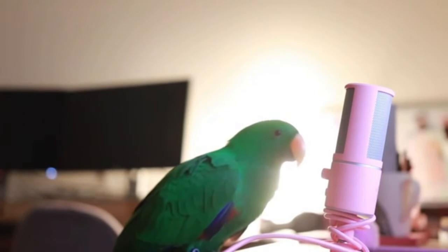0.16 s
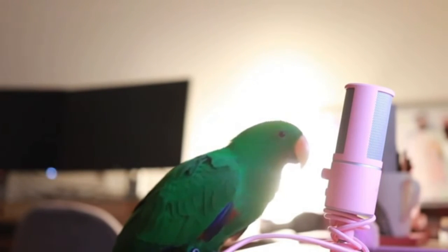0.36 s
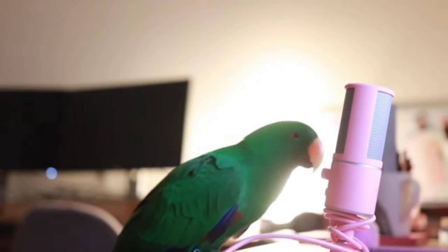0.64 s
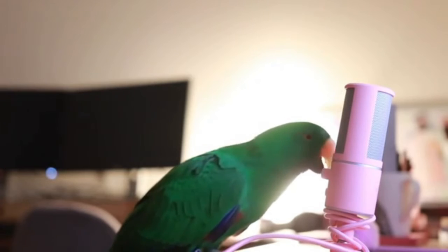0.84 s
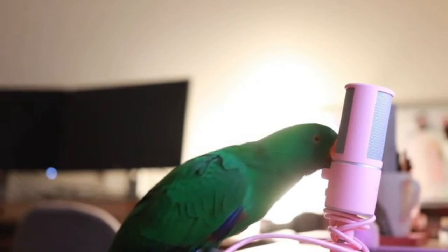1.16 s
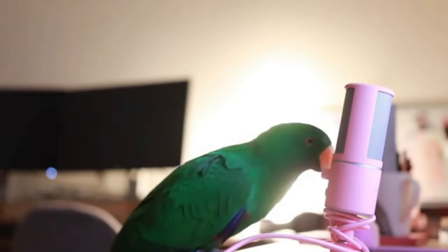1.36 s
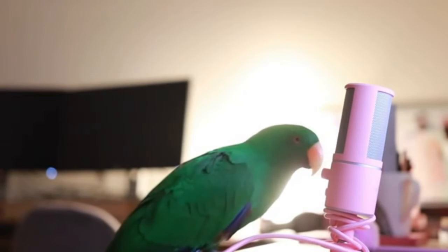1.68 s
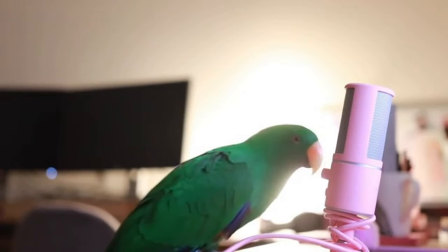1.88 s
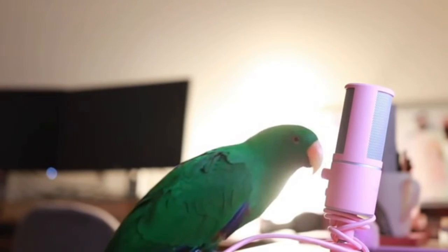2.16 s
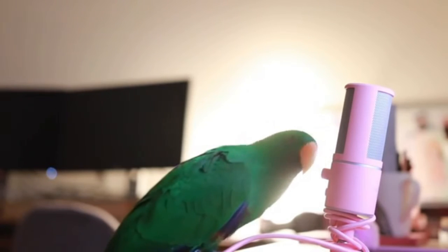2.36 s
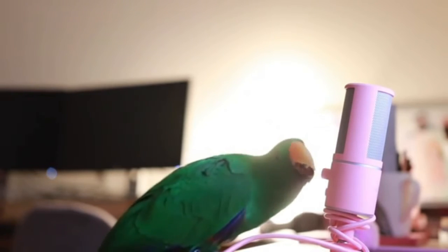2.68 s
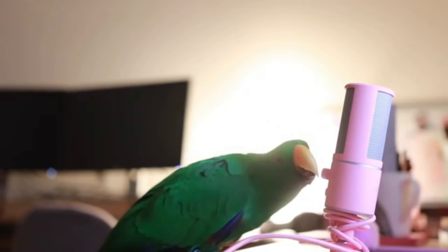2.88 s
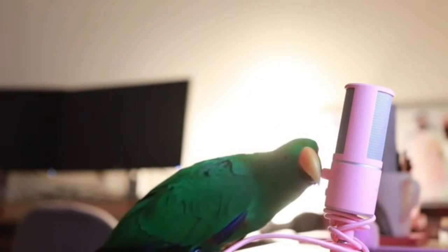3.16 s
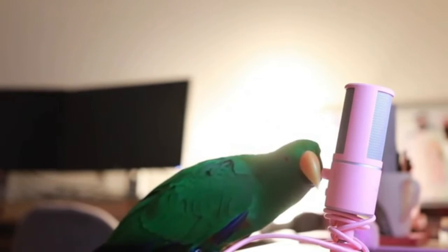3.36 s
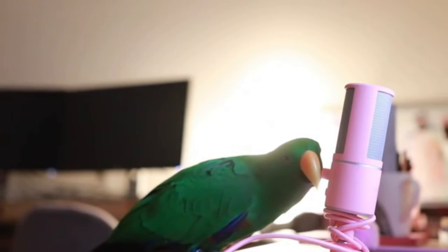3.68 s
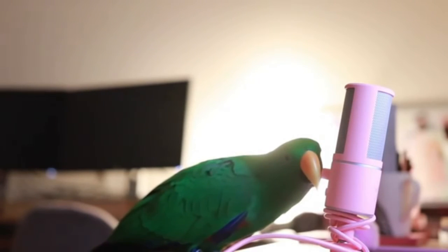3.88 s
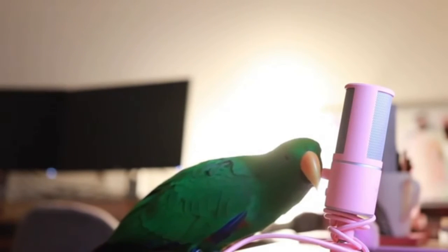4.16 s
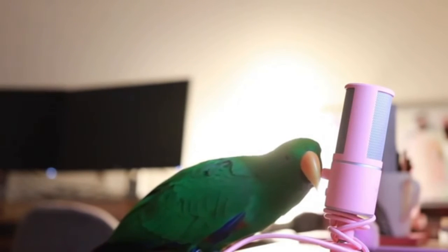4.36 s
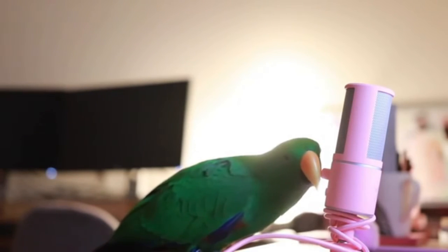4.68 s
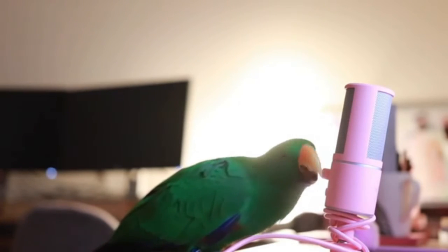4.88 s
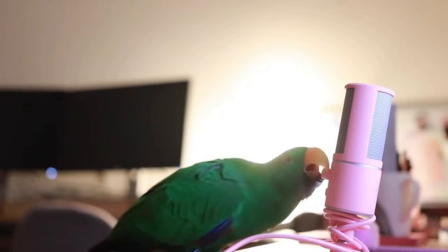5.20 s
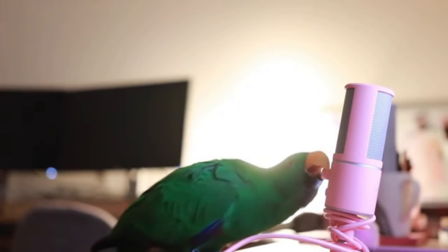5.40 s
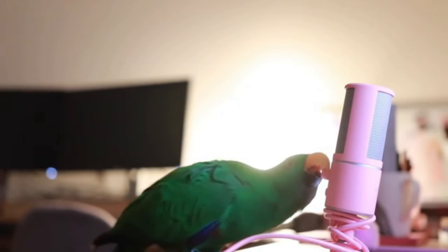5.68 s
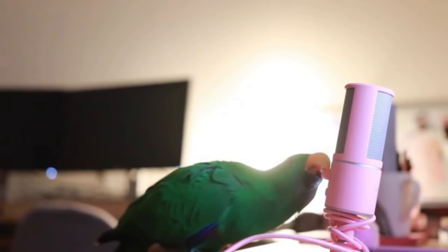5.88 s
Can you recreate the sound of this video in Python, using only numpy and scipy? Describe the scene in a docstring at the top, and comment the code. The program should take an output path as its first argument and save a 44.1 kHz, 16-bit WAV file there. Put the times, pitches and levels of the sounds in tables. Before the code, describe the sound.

Close to the microphone in a small quiet room, a parrot chirps once, sharply, with a brief echo. Soft rustling and two quick ticks lead to dull bumps and short scrapes on the ringing housing. A steady run of eight wet, popping clucks swells until the microphone overloads. It ends with beak rubs, a sharp clacking knock, rattly ticks and faint nibbling over a deep, wobbling stand rumble.

```python
"""A quiet room murmurs under a faint rumble; feathers rustle as filtered noise, and a beak tick rings briefly.
A parrot close to a desk microphone then gives one sharp chip: a high note that slackens into rough pulses.
Later its beak knocks and rubs on the microphone's housing, which rings and wobbles on its stand.
Eight clucks, short rings of mouth, beak, throat and chest, grow louder; more ticks, rubs and knocks follow.
The loudest calls overload the microphone, and a small room echoes the calls and ticks."""
import sys
import numpy as np
from scipy import signal
from scipy.fft import rfft, irfft
from scipy.io import wavfile
from scipy.ndimage import uniform_filter1d

SR = 44100
rng = np.random.default_rng(int(sys.argv[2]) if len(sys.argv) > 2 else 0)


def generate_wav(signal):
    """Clip the signal to [-1, 1] and save it as 16-bit WAV at the path in sys.argv[1]."""
    frames = np.transpose(np.atleast_2d(signal))
    scaled = np.clip(frames, -1, 1) * 32767
    pcm = np.round(scaled).astype(np.int16)
    wavfile.write(sys.argv[1], SR, pcm)


N = 266364
TIME = np.arange(N) / SR
TOP_HZ = 15700  # highest pitch kept

# sound colour of the quiet room: pitch_hz, level_db (per Hz)
ROOM_COLOUR = [(20, 0.5), (50, -10.5), (95, -5), (170, -17), (280, -16), (520, -28.5), (1700, -33.5),
               (2250, -32), (2600, -38.5), (4200, -42), (4900, -53), (6500, -49), (8000, -53.5),
               (15000, -57)]
# how the rumble changes as the bird leans on the microphone: time_s, level_db
LEANING_LEVELS = [(3.15, -61.5), (3.24, -43), (3.65, -40.5), (4.6, -43.5), (5.03, -34.5), (5.3, -37),
                  (5.95, -33), (6.04, -30)]
# sound colour of that rumble: pitch_hz, level_db (per Hz)
RUMBLE_COLOUR = [(15, -14), (28, 1.5), (45, -17.5), (75, -12), (125, -11.5), (170, -22.5), (260, -29.5),
                 (500, -45), (1000, -69)]
# faint rustles of feathers: start_s, length_s, level_db
FEATHER_RUSTLES = [(0.678, 0.7, -74.5), (2.43, 0.72, -69.5), (3.33, 0.39, -74.5), (5.4, 0.48, -76.5)]
# beak ticks: start_s, peak_db, beak_ring_hz, housing_db (compared with the peak)
BEAK_TICKS = [(1.33, -54, 4480, -5), (2.885, -35.5, 2600, -14), (2.908, -37.5, 2320, -12),
              (3.527, -42, 1600, 9.5), (4.888, -30.5, 1630, -27), (5.106, -38, 9400, -21),
              (5.512, -37, 2560, -21), (5.708, -48.5, 6800, 12), (5.742, -31, 2600, -8),
              (5.817, -37.5, 4500, -7.5), (5.907, -40.5, 2770, -24)]
# ways the microphone housing rings: pitch_hz, width_hz, level_db
HOUSING_RINGS = [(444, 244, -1), (666, 143, -0.5), (919, 75, -1), (1236, 57, -1), (1600, 230, -3),
                 (2200, 130, 7), (2520, 120, -2), (3050, 300, -5.5), (4185, 110, 4.5), (4480, 160, -8.5),
                 (5600, 500, -20), (6200, 360, -19), (7360, 350, -49.5), (8640, 490, -35.5),
                 (11890, 4500, -47)]
# echo of the small room: pitch_hz, level_db, t60_s (time to fade by 60 dB)
ROOM_ECHO = [(204.6, -43.5, .4), (697, -26.5, 0.34), (1583, -25.5, 0.37), (2300, -28.5, 0.36),
             (3180, -26, 0.41), (5000, -27.5, 0.4), (6500, -27.5, .33), (7853, -28, 0.11),
             (13910, -28, .15)]
# colour of throat and open beak: pitch_hz, level_db
THROAT_COLOUR = [(100, -15), (400, -12.5), (800, -10), (1600, -3.5), (2200, -1.5), (3150, -1), (4000, -3.5),
                 (4800, -20), (5500, -14), (6400, -27.5), (7900, -18), (9000, -31.5), (11000, -20),
                 (16000, -42.5)]
# knocks that shake the stand: start_s, thump_db, wobble_db and thud_db (compared with thump), clack_db
STAND_KNOCKS = [(3.186, -16.5, -8, -13, -40.5), (3.244, -26.5, -28, -10, -35.5),
                (5.146, -14, -20, -47, -17.5), (5.355, -13.5, -14, -19, -31),
                (5.636, -23, -1.5, -29.5, -45), (5.739, -18.5, -36, -13, -39), (5.932, -23, -14, -13, -60)]
# colour of the dull thud in a knock: pitch_hz, level_db (per Hz)
THUD_COLOUR = [(30, -16), (70, 9.5), (200, -2), (700, -13.5), (1600, -50)]
# beak strokes along the housing: start_s, length_s, pressure_db (at the end)
BEAK_STROKES = [(3.245, 0.042, -44.5), (3.353, 0.12, -48.5), (3.501, 0.0446, -47), (4.34, 0.028, -57.5),
                (4.759, .013, -59), (4.897, 0.2, -40.5), (5.179, 0.043, -53.5), (5.261, .102, -38),
                (5.928, 0.063, -55.5)]
# broad grit of the scraping beak itself: pitch_hz, width_hz, level_db
BEAK_GRIT = [(1130, 1300, -10.5), (8000, 8000, -31.5)]
# clucks: start_s, level_db, mouth_hz, mouth_swell_ms, beak_hz, beak_db (compared with mouth)
CLUCK_CALLS = [(3.609, -14.3, 1955, 0.79, 1330, -1.7), (3.787, -12.5, 1780, 0.63, 1426, -0.5),
               (3.953, -10.5, 1564, 0.87, 1380, -11.5), (4.112, -6.5, 1395, 0.85, 1530, -7.5),
               (4.278, -4.5, 1360, 1.07, 1560, -1), (4.4464, -4, 1580, 1.3, 1910, -13.5),
               (4.6177, -1.5, 1700, 1.6, 1970, -8.5), (4.785, 1.5, 1610, 2.11, 1938, 1.5)]
# wet snap of the tongue: pitch_hz, width_hz, level_db
TONGUE_SNAP = [(2470, 380, 8.5), (5180, 520, -4.5), (6450, 1170, -0.5), (9580, 850, -15.5),
               (12400, 910, -10.5)]
# narrow dips in the colour of a cluck: pitch_hz, width_hz
MOUTH_DIPS = [(560, 91), (3550, 400)]


def undb(db):
    """Turn decibels into a plain multiplier."""
    return 10 ** (np.asarray(db) / 20)


def unit(x):
    """Scale to an average (rms) level of 1."""
    return x / np.sqrt(np.mean(x ** 2))


def peak(x):
    """Scale so the highest point is 1."""
    return x / np.abs(x).max()


def add(track, start_s, sound):
    """Mix a sound into the track at a given time."""
    i = int(np.clip(start_s * SR, 0, N - 1))
    track[i:i + len(sound)] += sound[:N - i]


def colour(x, points):
    """Filter a sound to follow a curve of levels over pitch."""
    hz, db = np.transpose(points)
    pitches = np.maximum(np.fft.rfftfreq(len(x), 1 / SR), 1)
    gain = undb(np.interp(np.log(pitches), np.log(hz), db))
    return irfft(rfft(x) * gain, len(x))


def noise(points):
    """Make coloured noise with an average level of 1."""
    return unit(colour(rng.standard_normal(N), points))


def wander(size):
    """Slow random drift of spread 1, smoothed over size samples."""
    return unit(uniform_filter1d(rng.standard_normal(N), size=size))


def swell(t, length_s, attack_s, release_s):
    """A volume shape that rises, holds at 1 and falls to 0 at length_s."""
    return np.clip(np.minimum(t / attack_s, (length_s - t) / release_s), 0, 1)


def resonate(x, modes):
    """Ring several resonances side by side, each filtered twice for steep flanks."""
    out = 0
    for hz, width, db in modes:
        b, a = signal.iirpeak(min(hz, SR / 2 - 2000), max(hz / width, 1), SR)
        once = signal.lfilter(b, a, x)
        out = out + undb(db) * signal.lfilter(b, a, once)
    return out


def burst(t, hz, swell_ms, rise_octaves=0):
    """A ring that swells to 1 and soon dies, sliding through hz at its strongest moment."""
    u = t * 1000 / swell_ms
    pitch = hz * 2 ** (rise_octaves * np.tanh(u - 1))
    phase = 2 * np.pi * np.cumsum(pitch) / SR
    return u ** 2 * np.exp(2 - 2 * u) * np.sin(phase)


def crack(decay_ms):
    """The brief noise of a hard contact, dying away."""
    t = np.arange(SR // 20) / SR
    return rng.standard_normal(len(t)) * np.exp(-1000 * t / decay_ms)


def room_tone(level_db=-46.5):
    """The quiet room is steady coloured noise."""
    return undb(level_db) * noise(ROOM_COLOUR)


def leaning():
    """Low noise rumbles in the stand, with a level that follows how the bird leans on it."""
    times, levels_db = np.transpose(LEANING_LEVELS)
    return undb(np.interp(TIME, times, levels_db)) * noise(RUMBLE_COLOUR)


def feathers(attack_s=0.059, release_s=0.13):
    """A thin hiss that swells and fades each time the bird shifts."""
    motion = np.zeros(N)
    for start, length, db in FEATHER_RUSTLES:
        motion += undb(db) * swell(TIME - start, length, attack_s, release_s)
    return motion * noise([(1000, -20.5), (3000, -1.5), (6000, -5), (14000, -7), (16000, -16.0)])


def ticks(decay_ms=0.7, ring_width=0.45, crack_db=-22):
    """Beak horn meets horn or housing: a tiny crack, a short beak ring and the housing's own rings."""
    out = np.zeros(N)
    for start, db, hz, housing_db in BEAK_TICKS:
        contact = crack(decay_ms)
        # ring_width is a share of the ring's pitch
        beak = peak(resonate(contact, [(hz, ring_width * hz, 0), (6500, 6000, crack_db)]))
        housing = peak(resonate(contact, HOUSING_RINGS))
        add(out, start, undb(db) * (beak + undb(housing_db) * housing))
    return out


def echo(x, build_s=0.0014):
    """The small room answers with a blurred tail, whose highest treble dies soonest."""
    t = np.arange(SR * 2 // 3) / SR
    hz, db, t60 = np.transpose(ROOM_ECHO)
    pitches = np.maximum(np.fft.rfftfreq(len(t), 1 / SR), 1)
    scatter = rfft(rng.standard_normal(len(t)))
    tail = 0
    # each row of the identity picks one band, blending into its neighbours
    for share, band_db, band_t60 in zip(np.eye(len(hz)), db, t60):
        fade = np.exp(-np.log(1000) * t / band_t60) * (1 - np.exp(-t / build_s))
        band = irfft(scatter * np.interp(np.log(pitches), np.log(hz), share), len(t))
        tail = tail + undb(band_db) * band * fade / np.linalg.norm(fade)
    return signal.fftconvolve(x, tail)[:N]


def chip(rasp_db=-1, source_slope=0.1, darken=0.78, push_db=-21, rumble_db=-29):
    """The syrinx (voice organ) holds a high note, then slackens into rough, duller pulses that ring the throat."""
    start_s, hold_s, length_s = 1.458, 0.0148, 0.0328
    held_hz, sag_octaves_per_s = 1586, 112
    held_db, slack_db = 6, -4.5  # level of the held note; change when fully slack
    rough_held, rough_slack = 0.087, 0.5  # roughness from 0 to 1
    t = np.arange(int(length_s * SR)) / SR
    hz = held_hz * 2 ** (-sag_octaves_per_s * np.maximum(t - hold_s, 0))
    slack = 1 - hz / held_hz
    rough = rough_held + (rough_slack - rough_held) * slack
    envelope = swell(t, length_s, attack_s=0.0012, release_s=0.002)
    loudness = undb(held_db + slack_db * slack) * envelope
    jitter = wander(size=30)[:len(t)]
    phase = 2 * np.pi * np.cumsum(hz * (1 + 0.13 * rough * jitter)) / SR
    pulses = np.zeros(len(t))
    for k in range(1, 40):  # overtones, weaker higher up and when slack
        audible = k * hz < TOP_HZ
        pulses += np.sin(k * phase) * audible / k ** (source_slope + darken * slack)
    rasp = undb(rasp_db) * rough * (1 + np.cos(phase)) * rng.standard_normal(len(t))
    voice = colour(unit(pulses) + rasp, THROAT_COLOUR)
    # even out the level, so that loudness alone shapes it
    voice = voice / np.sqrt(uniform_filter1d(voice ** 2, size=160) + 1e-9)
    # a low, uneven push under the call, as the overloaded microphone is thrown off centre
    rumble = noise([(10, -4.5), (80, -3.5), (230, -4.5), (500, -16.0), (3000, -59.0)])[:len(t)]
    push = undb(push_db) + undb(rumble_db) * rumble
    out = np.zeros(N)
    add(out, start_s, (voice + push) * loudness)
    return out


def knocks(edge_db=-25, clack_low_hz=1200, clack_decay_ms=3.3):
    """Beak knocks clack on the housing, thump the stand and set it wobbling."""
    wobble_hz, wobble_t60_s = 27.3, 1
    thud_decay_s = 0.012  # dull shudder of the stand
    out, t = np.zeros(N), np.arange(SR) / SR
    wobble = np.sin(2 * np.pi * wobble_hz * t) * np.exp(-np.log(1000) * t / wobble_t60_s)
    thump = burst(t, hz=110.7, swell_ms=7.4)
    high_pass = signal.butter(1, clack_low_hz, "high", fs=SR)
    for start, db, wobble_db, thud_db, clack_db in STAND_KNOCKS:
        thud = unit(colour(rng.standard_normal(len(t)), THUD_COLOUR)) * np.exp(-t / thud_decay_s)
        shake = thump + undb(thud_db) * thud + undb(wobble_db) * wobble
        add(out, start, undb(db) * shake)
        contact = signal.lfilter(*high_pass, crack(clack_decay_ms))
        clack = peak(resonate(contact, HOUSING_RINGS + [(6840, 4200, edge_db)]))
        add(out, start, undb(clack_db) * clack)
    return out


def rubs(slips_per_s=2600, patchy_db=2.0, shift_db=0.5, rub_db=0.53):
    """The beak sticks and slips on the housing: dense uneven clicks make it ring."""
    stroke_swell_db, stroke_ease = 15, 4.4  # each stroke presses harder by this much, quickly at first
    nibble_start_s, nibble_db, nibble_spread_db = 5.41, -67, 6  # light, uneven nibbling from then on
    # lighter strokes are duller: dB per octave for each dB below a firm stroke
    firm_db, brighten = -32, 0.091
    pressure = (TIME > nibble_start_s) * undb(nibble_db + nibble_spread_db * wander(size=900))
    for start, length, db in BEAK_STROKES:
        to_go = np.linspace(1, 0, max(int(length * SR), 2))
        add(pressure, start, undb(db - stroke_swell_db * to_go ** stroke_ease))
    pressure = np.maximum(uniform_filter1d(pressure, size=160), 1e-9)
    slips = (rng.random(N) < slips_per_s / SR) * rng.standard_normal(N)
    slips = slips * undb(patchy_db * wander(size=400))
    force = slips * pressure / resonate(slips, HOUSING_RINGS).std()
    out = 0
    for hz, width, db in HOUSING_RINGS + BEAK_GRIT:
        tilt = (pressure / undb(firm_db)) ** (brighten * np.log2(hz / 3000))
        # as the point of contact moves, each ring is driven more or less
        drive = force * tilt * undb(shift_db * wander(size=1800))
        out = out + resonate(drive, [(hz, width, db)])
    return undb(rub_db) * out


def mouth_cavities(x):
    """Side cavities of the mouth swallow narrow bands of pitch."""
    for hz, width in MOUTH_DIPS:
        x = signal.lfilter(*signal.iirnotch(hz, hz / width, SR), x)
    return x


def clucks(chest_hz=320, chest_ms=0.84, throat_ms=1.23, beak_ms=0.93):
    """A few cycles ring in mouth, beak, throat and chest; the harder the cluck, the more the tongue snaps."""
    throat_hz, throat_db = 863, -5.5  # level compared with the mouth
    mouth_rise_octaves = 0.19  # the mouth's ring slides up as it opens
    # level in a 0 dB cluck, then dB gained for each dB of the cluck
    chest_db, chest_growth = -15.5, 0.4
    snap_db, snap_growth = -19, 2.5
    out, t = np.zeros(N), np.arange(SR // 40) / SR
    for start, db, mouth_hz, mouth_ms, beak_hz, beak_db in CLUCK_CALLS:
        mouth = burst(t, mouth_hz, mouth_ms, mouth_rise_octaves)
        beak = undb(beak_db) * burst(t, beak_hz, beak_ms)
        throat = undb(throat_db) * burst(t, throat_hz, throat_ms)
        chest = undb(chest_db + chest_growth * db) * burst(t, chest_hz, chest_ms)
        wet_noise = np.abs(mouth) * rng.standard_normal(len(t))
        snap = undb(snap_db + snap_growth * db) * peak(resonate(wet_noise, TONGUE_SNAP))
        add(out, start, snap - undb(db) * (mouth + beak + throat) - chest)
    return mouth_cavities(out)


def scene(cluck_room_db=3.5, tick_room_db=-3.5):
    """Calls and ticks fill the room; rubs and knocks reach the capsule through its housing."""
    ticking, call, clucking = ticks(), chip(), clucks()
    # amounts sent to the echo are compared with the chip's
    room = echo(call + undb(cluck_room_db) * clucking + undb(tick_room_db) * ticking)
    background = room_tone() + leaning() + feathers()
    handling = knocks() + rubs()
    mono = background + ticking + call + room + handling + clucking
    return np.array([mono, mono])


def record(dry, knee=8, treble_hz=13000):
    """The microphone saturates near full scale, softens the treble and blocks steady pressure; the top is cut."""
    fine = signal.resample_poly(dry, 2, 1, axis=1)  # double rate for the overload
    clipped = fine / (1 + np.abs(fine) ** knee) ** (1 / knee)
    softened = signal.lfilter(*signal.butter(2, treble_hz, fs=2 * SR), clipped)
    normal_rate = signal.resample_poly(softened, 1, 2, axis=1)
    steady_block = signal.butter(1, 4, "high", fs=SR, output="sos")
    coupled = signal.sosfilt(steady_block, normal_rate)
    top_cut = signal.ellip(10, 0.1, 80, TOP_HZ, fs=SR, output="sos")
    return 0.93 * signal.sosfilt(top_cut, coupled)


dry = scene()
out = record(dry)
generate_wav(out)
```